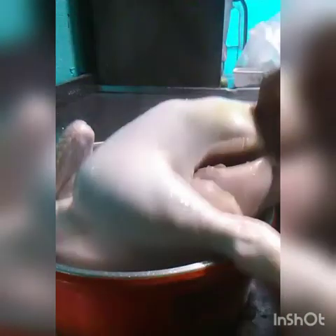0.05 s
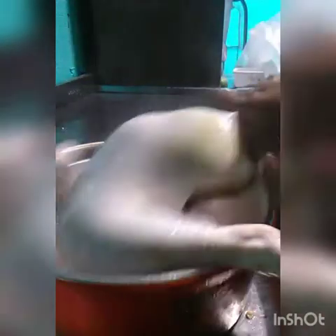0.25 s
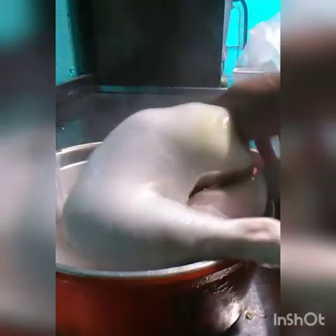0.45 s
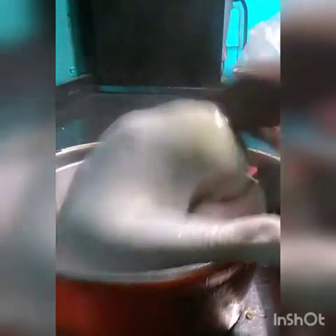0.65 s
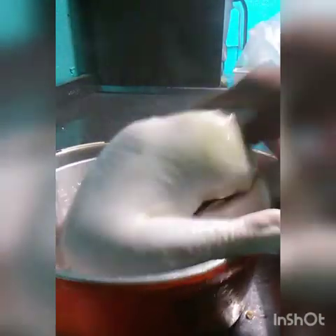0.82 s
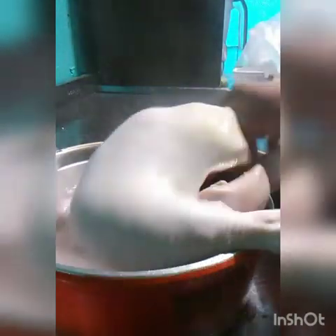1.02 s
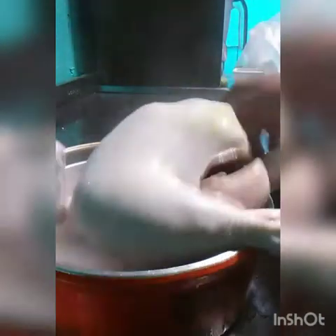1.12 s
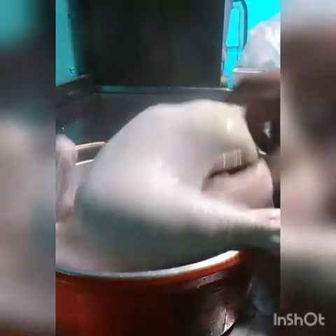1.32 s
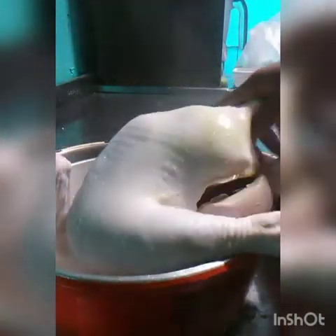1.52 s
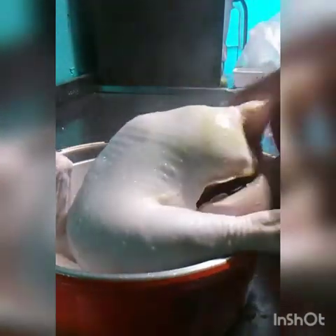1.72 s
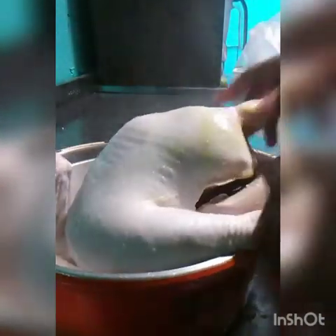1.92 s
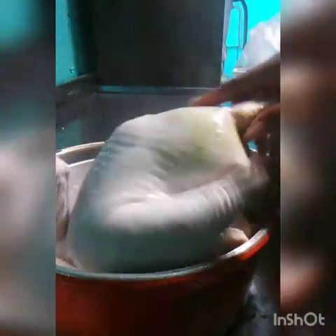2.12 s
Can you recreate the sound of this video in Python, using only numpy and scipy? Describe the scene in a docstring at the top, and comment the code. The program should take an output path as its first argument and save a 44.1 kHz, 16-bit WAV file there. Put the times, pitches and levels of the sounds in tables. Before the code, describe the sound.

Raw chicken handled in a metal pot, with wet squelches, knocks and low thumps.

```python
"""A small, hard-walled kitchen, a phone's two microphones close to a metal pot.
A raw chicken is turned in the pot by hand. Wet skin peels in bursts of tiny clicks and drags with
a hollow rasp; bone knocks and flesh bumps on the damped wall, and the weight makes the base boom.
Trapped air pops, a fingertip taps twice, and the room rings on briefly over a faint hush."""
import sys
import numpy as np
from scipy import signal
from scipy.fft import rfft, irfft
from scipy.io import wavfile
from scipy.ndimage import uniform_filter1d

SR = 44100
rng = np.random.default_rng(int(sys.argv[2]) if len(sys.argv) > 2 else 0)


def store_pcm(level_fs):
    """Save levels as 16-bit WAV."""
    pcm = np.round(np.clip(level_fs, -1, 1) * 32767).astype(np.int16)
    wavfile.write(sys.argv[1], SR, np.atleast_2d(pcm).T)


N = 94815
LEAD = SR // 8  # samples kept ahead of each event
AGE = np.arange(-LEAD, 3 * LEAD) / SR  # seconds from the event's time
SIDE_SIGNS = np.array([[1], [-1]])  # left, right


def amp(db):
    return 10 ** (np.asarray(db) / 20)


def on_log(hz, table, column=1):
    """A table column read on a log-frequency axis."""
    table = np.array(table, float)
    return np.interp(np.log(hz + 1), np.log(table[:, 0]), table[:, column])


def colour(x, table, column=1):
    """Shape a sound by (frequency [Hz], gain [dB]) points."""
    size = x.shape[-1]
    gain = amp(on_log(np.fft.rfftfreq(2 * size, 1 / SR), table, column))
    return irfft(rfft(x, 2 * size) * gain)[..., :size]


def band(x, lo_hz, hi_hz=SR / 2, order=3):
    sos = signal.butter(order, [lo_hz, min(hi_hz, SR / 2 - 1)], "band", fs=SR, output="sos")
    return signal.sosfilt(sos, x + 1e-18)


def at_level(x, db, window=260):
    """Scale a sound so that its loudest few milliseconds have this level."""
    power = np.mean(np.atleast_2d(x) ** 2, axis=0)
    return x * amp(db) / np.sqrt(uniform_filter1d(power, window).max())


def add(out, x, time):
    """Mix in an event so that its age zero falls at this time."""
    at = int(time * SR) - LEAD
    a, b = max(at, 0), min(at + x.shape[-1], N)
    out[..., a:b] += x[..., a - at:b - at]


def grains(rise, fall, per_s=2400, spread_db=4):
    """A swarm of tiny uneven impulses that swells up to age zero and dies away."""
    size = len(AGE)
    hits = (rng.random(size) < per_s / SR) * np.sign(rng.standard_normal(size))
    strength = amp(spread_db * np.minimum(rng.exponential(size=size), np.pi))
    envelope = np.exp(np.where(AGE < 0, -(AGE / rise) ** 2 / 2, 1 - np.hypot(1, AGE / fall)))
    return hits * strength * envelope


def scatter(x, fall_s=0.00081, gain_db=9.5):
    """Add quick reflections off pot and counter, different for every spot and each microphone."""
    t = np.arange(LEAD // 4) / SR
    paths = band(rng.standard_normal((2, len(t))) * np.exp(-t / fall_s), lo_hz=1140, order=2)
    paths = amp(gain_db) * paths / np.sqrt(np.sum(paths ** 2, axis=1, keepdims=True))
    return x + signal.fftconvolve(x[None], paths, axes=1)[:, :len(x)]


# Room tone at the microphones (frequency [Hz], relative level [dB])
HUSH_SPECTRUM = [(25, -63), (58, 1.5), (85, -16), (1500, -33), (14000, -40.5)]
def hush(level_db=-64.5):
    """Faint room rumble, alike on both sides, under a thin, wide hiss."""
    mid, side = colour(rng.standard_normal((2, N)), HUSH_SPECTRUM)
    side = 0.083 * side + band(side, lo_hz=870, order=1)
    return (mid + side * SIDE_SIGNS) * amp(level_db) / np.std(mid)


# Wet skin peeling, close up (time [s], rise [s], fall [s], level [dB], low edge [Hz])
SKIN_PEELS = [(.008, 0.034, 0.035, -56.5, 5460), (0.11, 0.0035, 0.049, -52, 2410),
              (0.127, 0.00024, 0.0054, -40.5, 1560), (0.142, 0.0017, 0.0026, -32.5, 5100),
              (0.158, 0.0065, 0.0044, -34.5, 5400), (0.224, 0.0091, 0.0084, -49.5, 1970),
              (0.352, 0.011, 0.018, -34, 2370), (0.483, 0.001, 0.0043, -36.5, 1890),
              (0.518, 0.00039, 0.004, -37, 6400), (0.527, 0.034, 0.025, -36.5, 2600),
              (.568, 0.011, 0.008, -35.5, 6690), (0.633, 0.0037, 0.007, -33.5, 2740),
              (0.749, 0.0011, 0.018, -44, 2040), (0.805, 0.0078, 0.024, -40.5, 3780),
              (0.845, 0.0019, 0.0056, -24.5, 5200), (.900, 0.0056, 0.0054, -25, 2500),
              (0.949, 0.0051, 0.0046, -35.5, 6200), (1.038, 0.005, 0.016, -44.5, 8100),
              (1.177, 0.00036, .022, -41, 4620), (1.329, 0.0042, 0.013, -28, 2373),
              (1.349, 0.0026, 0.0047, -33, 3600), (1.473, 0.00077, 0.011, -41.5, 3800),
              (1.748, 0.0015, 0.015, -40.5, 7760), (1.842, 0.01, 0.01, -36.5, 3000)]
# Tone of the wet clicks (frequency [Hz], gain [dB])
WET_SPECTRUM = [(3000, 4), (6500, 0.5), (9200, 3), (14500, -2.5)]
def squelches(snap_db=-13):
    """The wet film tears in a swarm of clicks at four spots; wider gaps reach lower."""
    out = np.zeros((2, N))
    for time, rise, fall, db, low_hz in SKIN_PEELS:
        clicks = grains(rise, fall, per_s=2000, spread_db=3.7)
        crest_energy = np.sum(clicks[LEAD:LEAD + SR // 250] ** 2)
        clicks[LEAD] += amp(snap_db) * np.sqrt(crest_energy + 1)  # one crisp snap as the film lets go
        spots = rng.integers(4, size=len(AGE))
        tear = sum(scatter(clicks * (spots == spot)) for spot in np.unique(spots))
        wet = colour(band(tear, low_hz, order=5), WET_SPECTRUM)
        add(out, at_level(wet, db), time)
    return out


# Skin dragging in the pot (time [s], rise [s], fall [s], pitch [Hz], level [dB])
SKIN_DRAGS = [(0.049, 0.022, 0.0062, 419.5, -42.5), (.703, 0.02, 0.012, 1018, -39.5),
              (1.762, 0.018, 0.055, 3120, -50.5), (1.841, 0.042, 0.017, 850, -41)]
def rubs(q=2.03):
    """Stick and slip of skin rings the hollow under it."""
    out = np.zeros((2, N))
    for time, rise, fall, hz, db in SKIN_DRAGS:
        slips = grains(rise, fall)
        rasp = band(slips, hz * (1 - .5 / q), hz * (1 + .5 / q))
        add(out, at_level(scatter(rasp), db), time)
    return out


# Modes of the pot, damped by its load (frequency [Hz], width [Hz], gain [dB])
POT_MODES = [(274.5, 13, 3), (333, 98, 1.5), (512.1, 28, 10), (586.5, 40, 6.5), (700.3, 27, -1.5),
             (774, 26, -8.5), (931, 95, -3.5), (1038, 36, -7), (1209, 170, -2.5), (1515.5, 65, 2.5),
             (2215, 25, -8.5)]
# Firm knocks on the pot wall (time [s], pitch [Hz], level [dB])
BONE_KNOCKS = [(.227, 700, -28), (.353, 797, -25.5), (0.357, 260, -25), (.544, 527, -24),
               (.639, 300, -27.5), (.8995, 1480, -27.5), (.907, 405, -24), (1.833, 956, -36),
               (1.831, 2414, -41)]
def knocks(reach_octaves=0.37, contact_s=0.0012, detune=.01):
    """Bone under the skin strikes the wall: one clean push, and the modes near its pitch ring out."""
    out, age = np.zeros((2, N)), np.maximum(AGE, 0)
    for time, centre_hz, db in BONE_KNOCKS:
        ring = 0
        for hz, width, mode_db in POT_MODES:
            reach = np.exp(-(np.log2(hz / centre_hz) / reach_octaves) ** 2 / 2)
            loaded_hz = hz * (1 + detune * rng.standard_normal())  # the weight shifts between knocks
            mode = np.sin(2 * np.pi * loaded_hz * age) * np.exp(-np.pi * width * age)
            ring += reach * amp(mode_db) * mode
        add(out, at_level(ring * (1 - np.exp(-age / contact_s)), db), time)
    return out


# The pot's low ring, middle ring and slap (low edge [Hz], high edge [Hz])
POT_REGISTERS = [(205, 352), (460, 990), (1230, 4070)]
# Flesh on the pot wall (time [s], rise [s], fall [s], low ring [dB], middle ring [dB], slap [dB])
FLESH_BUMPS = [(0.229, 0.0084, 0.0095, -40, -29.5, -39.5), (.362, 0.013, 0.0024, -35, -26.5, -29.5),
               (.414, 0.011, 0.0064, -36.5, -35, -45.5), (0.504, 0.014, 0.018, -39.5, -44, -41),
               (0.55, 0.0091, 0.014, -37, -30.5, -38), (0.641, 0.017, 0.0073, -34.5, -31, -35),
               (0.77, 0.024, 0.018, -41, -46, -53), (0.907, 0.018, 0.0098, -33.5, -26, -33),
               (0.947, 0.018, 0.0086, -58, -35, -36), (1.840, 0.0036, 0.0056, -63, -41.5, -35)]
def bumps(thud_db=-17):
    """Flesh lands and slips on the wall; where it touches decides which registers of the pot answer."""
    out = np.zeros((2, N))
    for time, rise, fall, *levels in FLESH_BUMPS:
        force = grains(rise, fall)
        wall = amp(thud_db) * band(force, 70, 950, order=1)
        for hz, width, db in POT_MODES:
            wall += amp(db) * signal.lfilter(*signal.iirpeak(hz, hz / width, SR), force)
        wall = scatter(wall)
        for (lo, hi), db in zip(POT_REGISTERS, levels):
            add(out, at_level(band(wall, lo, hi, order=4), db, window=600), time)
    return out


# The weight settling on the base (time [s], level [dB])
BASE_LANDINGS = [(0.355, -35), (.410, -34), (0.483, -34.5), (0.639, -31), (0.737, -35.5), (0.903, -23)]
def booms(base_hz=77.1, rise_s=.018, fall_s=.027, rumble_db=-5.5):
    """Each soft landing swings the base of the pot, with a little dragging rumble."""
    out, age = np.zeros(N), np.maximum(AGE, 0)
    envelope = (1 - np.exp(-(age / rise_s) ** 2)) * np.exp(-age / fall_s)
    swing = np.sin(2 * np.pi * base_hz * age) * envelope
    for time, db in BASE_LANDINGS:
        rumble = band(grains(rise=0.0082, fall=0.025), 39, 250, order=2)
        add(out, at_level(swing, db) + at_level(rumble, db + rumble_db), time)
    return out


# Trapped air near the microphones, plus a brief high squeak of tearing skin (time [s], pitch [Hz], fall [s],
# level [dB])
AIR_POCKETS = [(0.485, 1990, 0.002, -30.5), (0.78, 1526, 0.0025, -34), (0.8448, 9000, 0.0013, -22.5),
               (0.8467, 5506, 0.0015, -32.5), (1.539, 1567, 0.0069, -49.5)]
def pops(glide_per_s=4.6):
    """A pocket of air rings briefly, rising in pitch as it opens; the highest, shortest rows are the squeak of
    the tearing wet skin."""
    out, age = np.zeros((2, N)), np.maximum(AGE, 0)
    for time, hz, fall, db in AIR_POCKETS:
        tone = np.sin(2 * np.pi * hz * (age + glide_per_s * age ** 2 / 2))
        decay = np.exp(-age / fall)
        pop = tone * (1 - decay) ** 2 * decay
        add(out, at_level(scatter(pop), db), time)
    return out


# Light, dry taps close by (time [s], pitch [Hz], level [dB])
FINGER_TAPS = [(1.686, 1608, -56.5), (1.946, 393, -47.5)]
def taps(width_hz=145, click_db=-8.5):
    """A fingertip ticks with a very short ring, too lightly to sound the pot."""
    out, touch = np.zeros(N), signal.unit_impulse(len(AGE), LEAD)
    for time, hz, db in FINGER_TAPS:
        ring = signal.lfilter(*signal.iirpeak(hz, hz / width_hz, SR), touch)
        click = band(touch, hz, 4150, order=4)
        add(out, at_level(ring, db) + at_level(click, db + click_db), time)
    return out


# The room from beside the pot (frequency [Hz], t60 [s], tail gain [dB], left-right likeness [0-1])
KITCHEN_TAIL = [(260, 0.43, -17, .9), (610, 0.31, -4.5, 0.95), (1590, 0.31, -10, 1), (9000, 0.33, -7, 0),
                (14300, 0.22, -4, 0)]
def kitchen(x, build_s=0.0081):
    """The direct sound plus the diffuse tail thrown back by hard, close walls."""
    t = np.arange(SR * 3 // 4) / SR
    edges = np.geomspace(45, 16000, 15)
    response = 0
    for lo, hi in zip(edges, edges[1:]):
        t60, db, alike = (on_log(np.sqrt(lo * hi), KITCHEN_TAIL, column) for column in (1, 2, 3))
        envelope = (1 - np.exp(-t / build_s)) * np.exp(-np.log(1000) * t / t60)
        tails = band(rng.standard_normal((2, len(t))), lo, hi) * envelope
        mid, side = tails * np.sqrt((hi - lo) / SR / np.sum(tails ** 2, axis=1, keepdims=True))
        response += amp(db) * (np.sqrt(1 + alike) * mid + np.sqrt(1 - alike) * side * SIDE_SIGNS)
    return x + signal.fftconvolve(x, response, axes=1)[:, :N]


def scene():
    """The near pops arrive in full but feed the room at half strength; the taps stay dry."""
    half_pops = .5 * pops()
    handling = bumps() + knocks() + booms() + rubs() + squelches()
    return kitchen(handling + half_pops) + half_pops + taps() + hush()


# The phone's two microphones (frequency [Hz], left gain [dB], right gain [dB])
MIC_RESPONSE = [(315, 4, 4), (640, 3, -1), (1440, 4.5, -1.5), (2020, -1, 0), (5040, -2, -2),
                (7630, -9, 2.5), (9520, -6.5, 8.5), (11360, -2.5, -2), (12050, 5, 0), (15100, -2.5, -6)]
def record(dry, top_hz=14300):
    """Each microphone port colours the sound in its own way; the top is cut."""
    left = colour(dry[0], MIC_RESPONSE, column=1)
    right = colour(dry[1], MIC_RESPONSE, column=2)
    right = band(right, lo_hz=30, order=1)  # this port rolls off the deepest bass
    top_cut = signal.ellip(8, .2, 70, top_hz, fs=SR, output="sos")
    return signal.sosfilt(top_cut, [left, right])


dry = scene()
out = record(dry)
store_pcm(out)
```